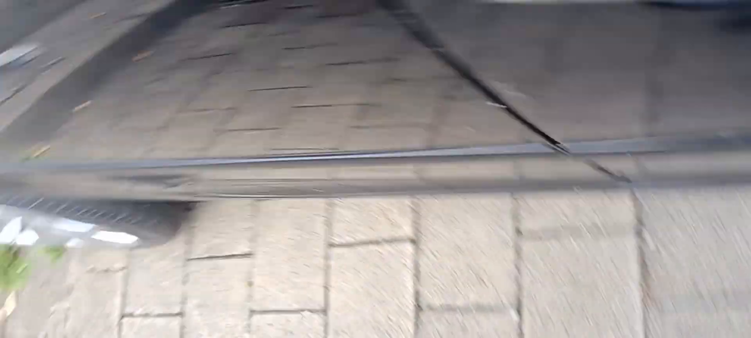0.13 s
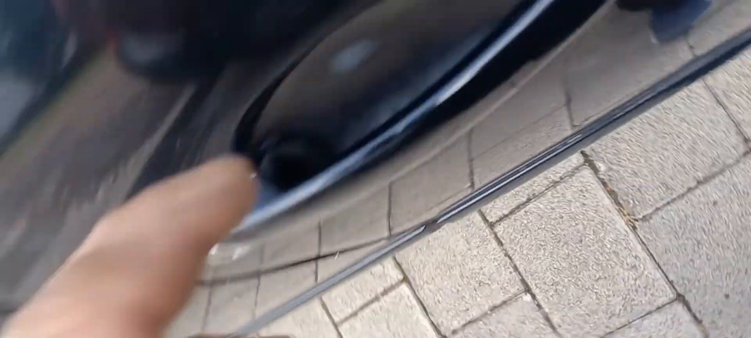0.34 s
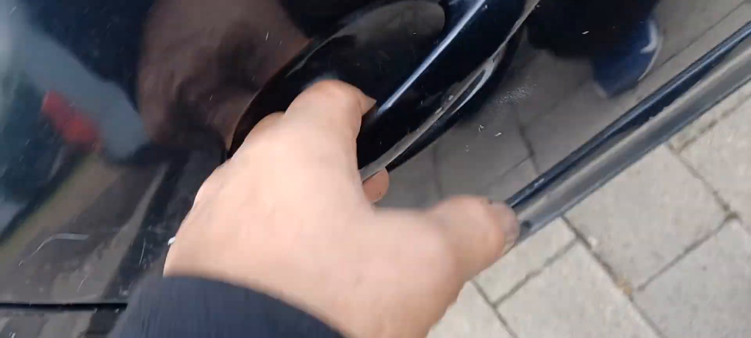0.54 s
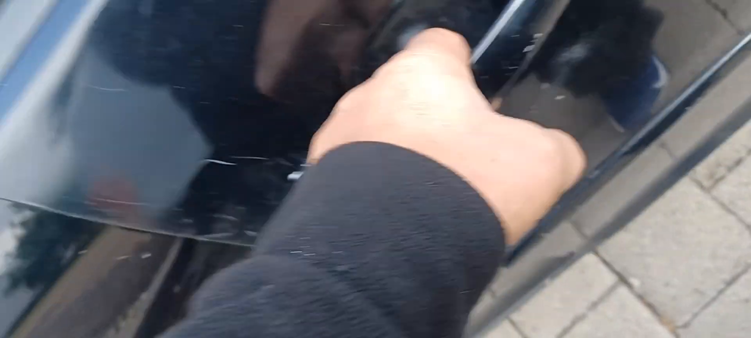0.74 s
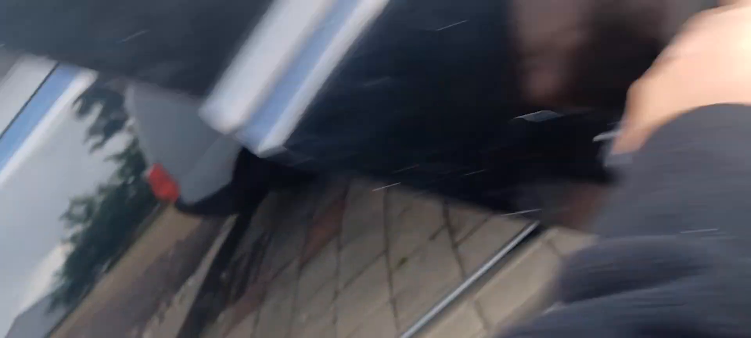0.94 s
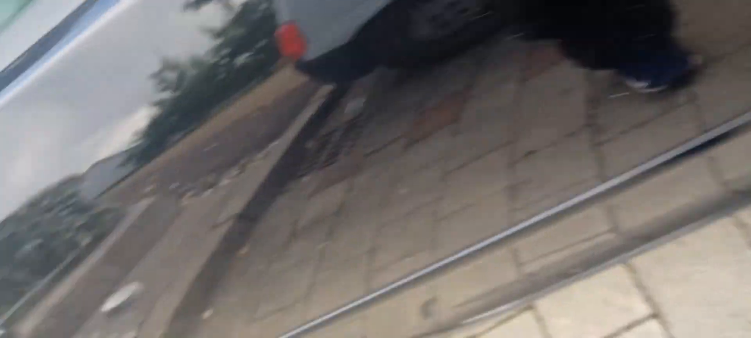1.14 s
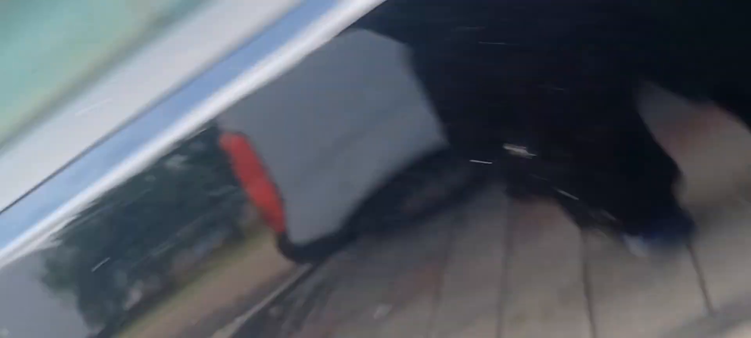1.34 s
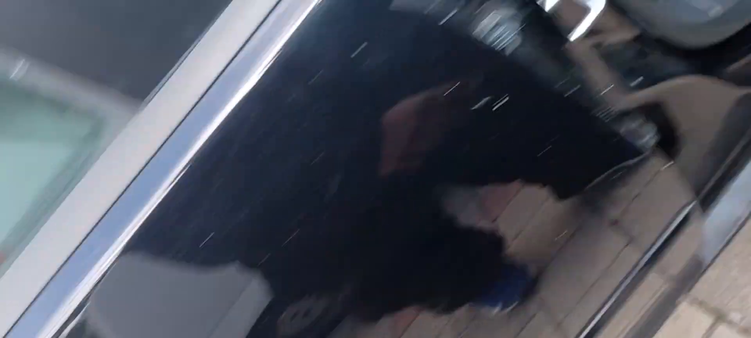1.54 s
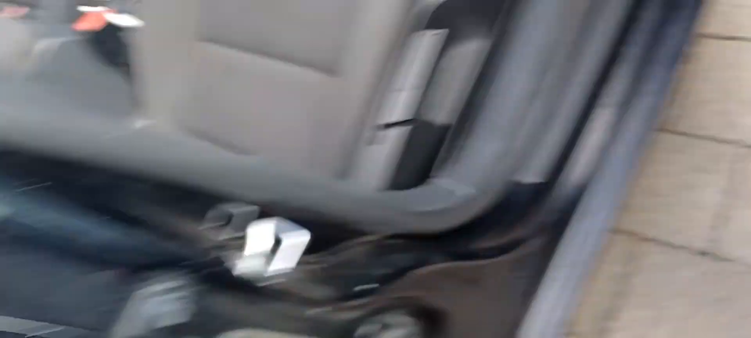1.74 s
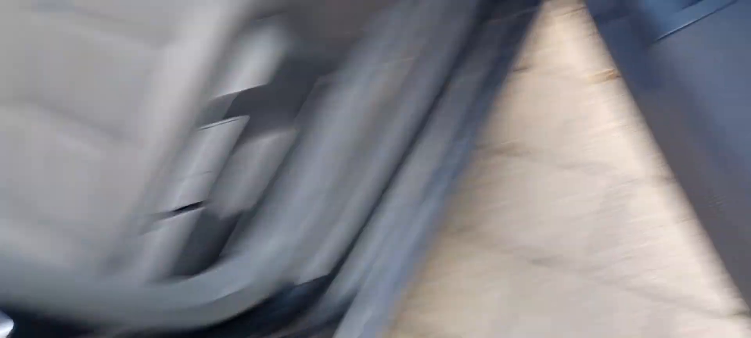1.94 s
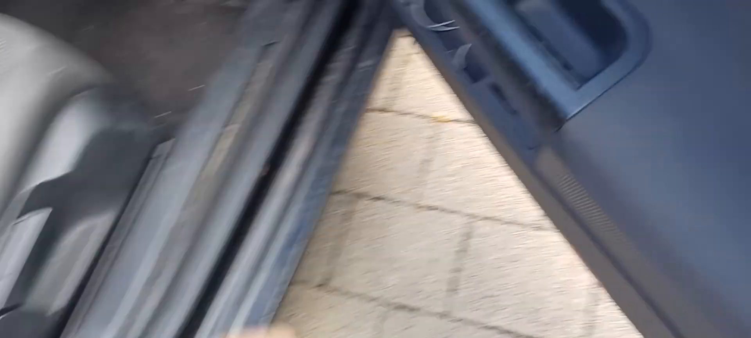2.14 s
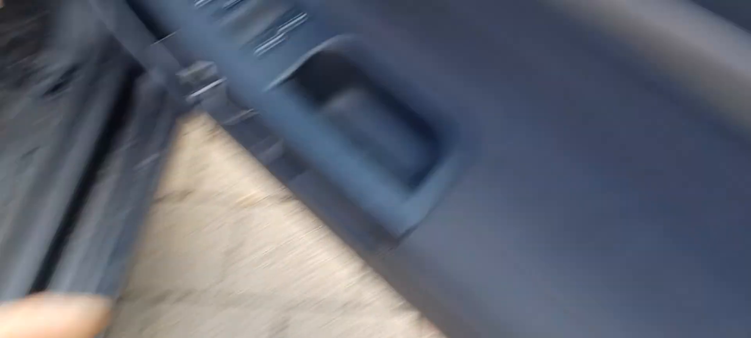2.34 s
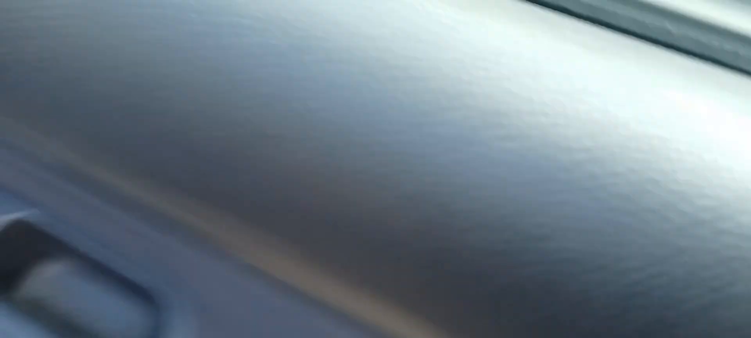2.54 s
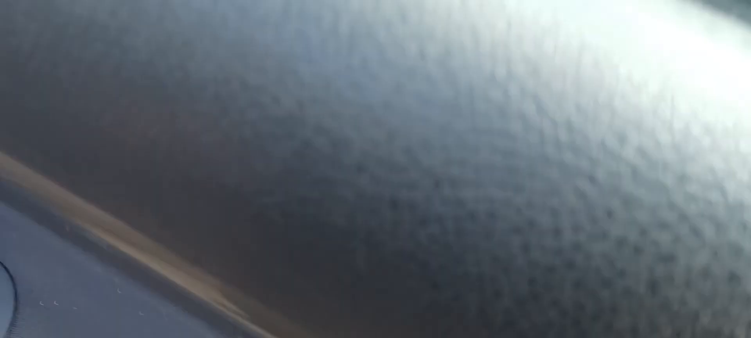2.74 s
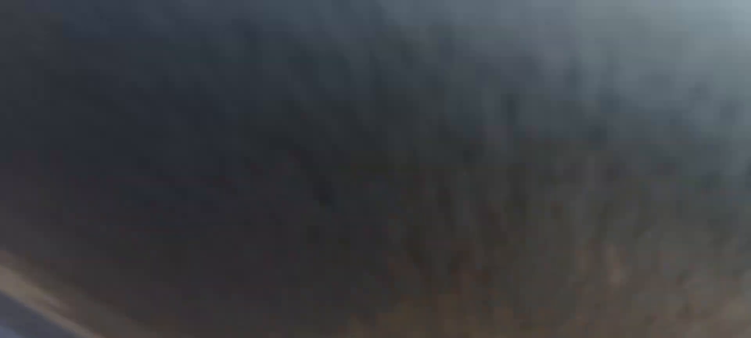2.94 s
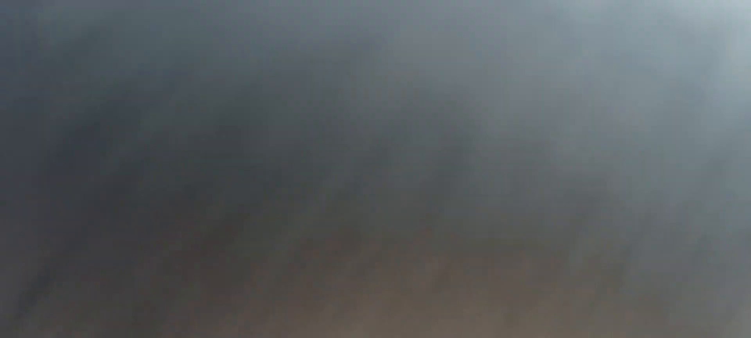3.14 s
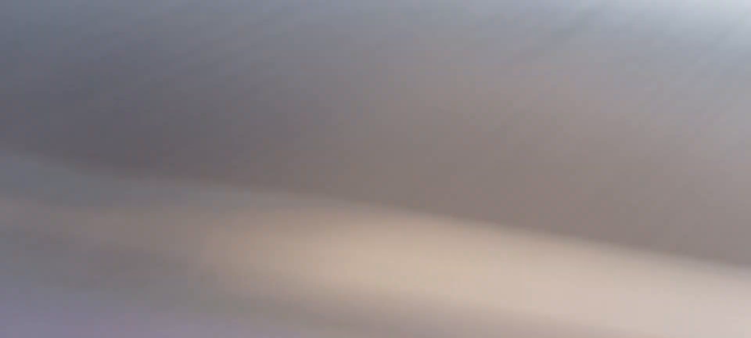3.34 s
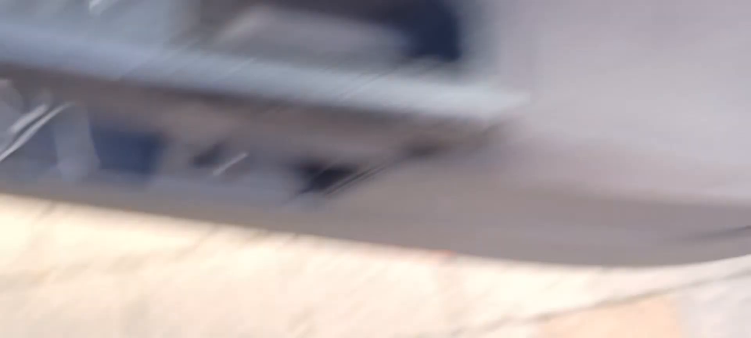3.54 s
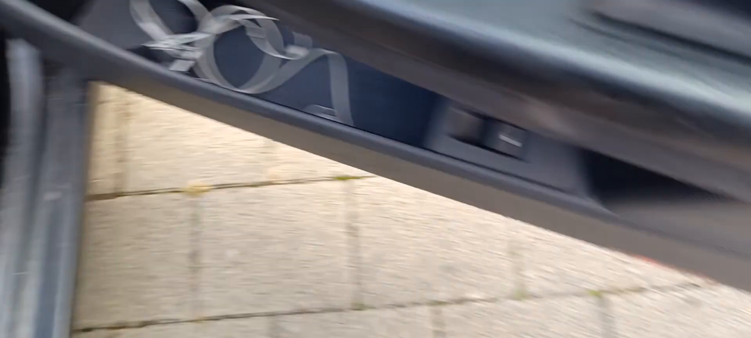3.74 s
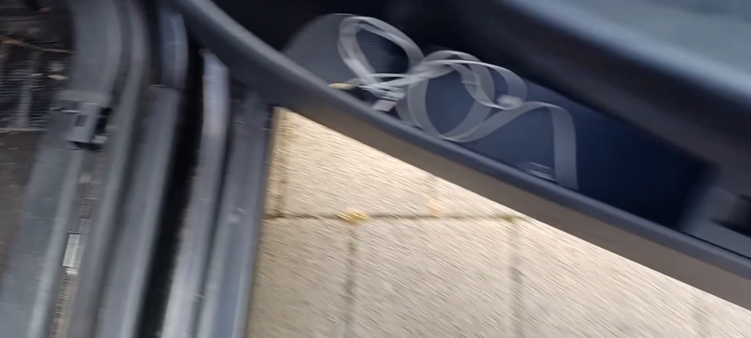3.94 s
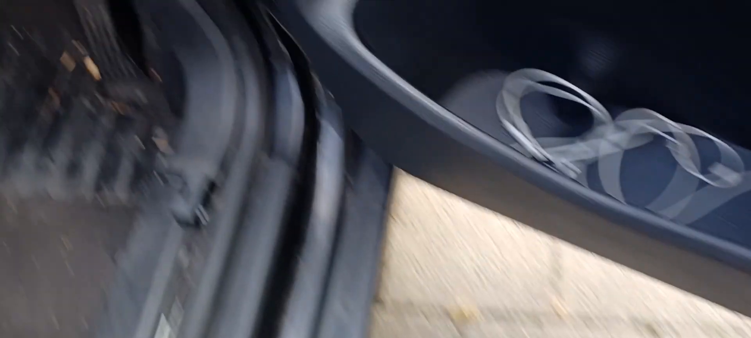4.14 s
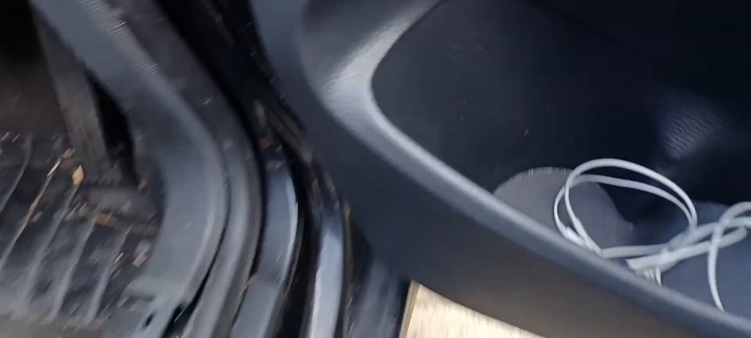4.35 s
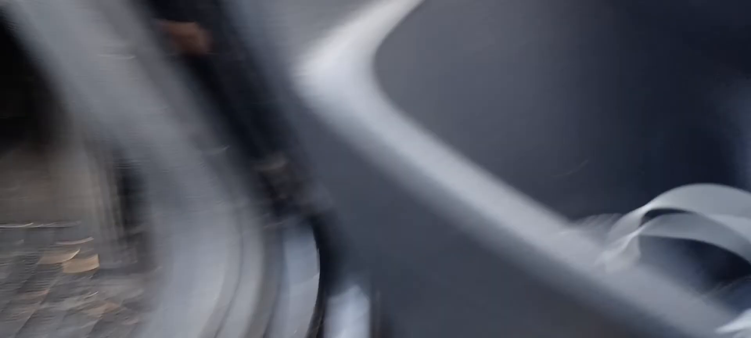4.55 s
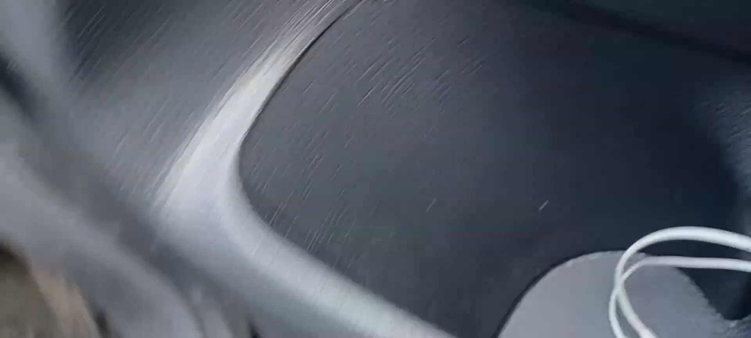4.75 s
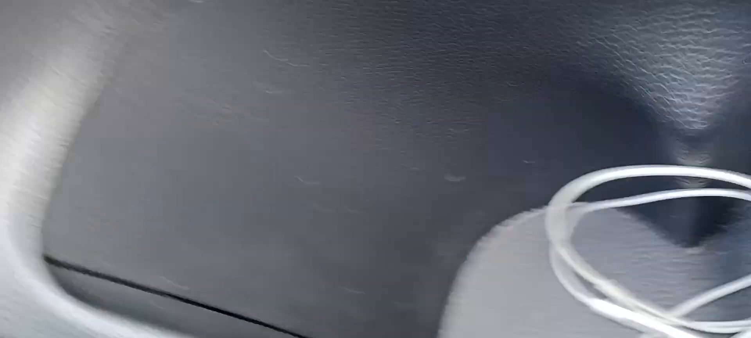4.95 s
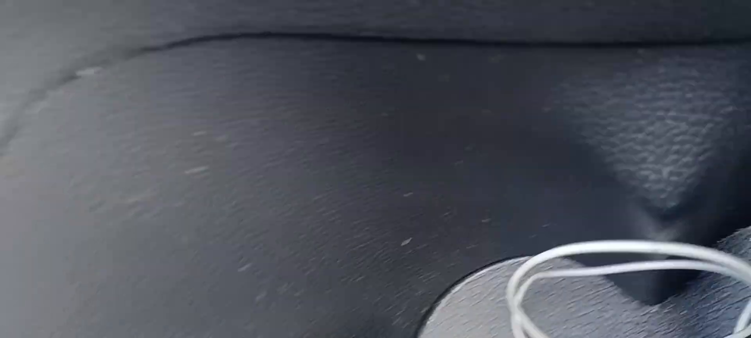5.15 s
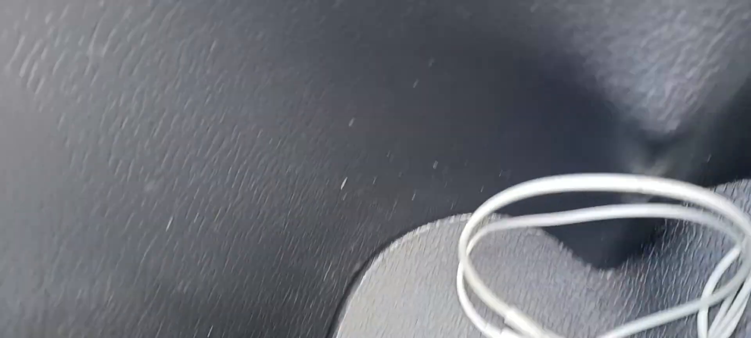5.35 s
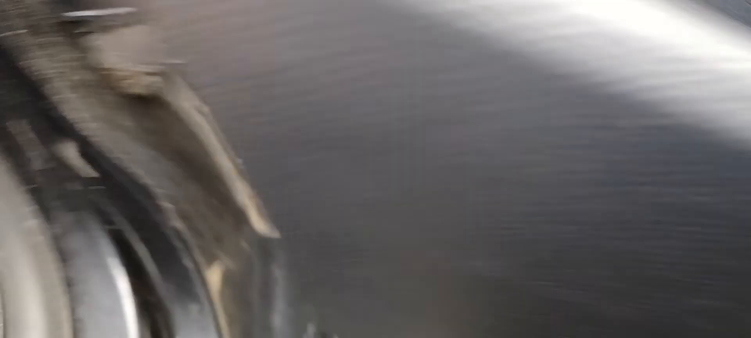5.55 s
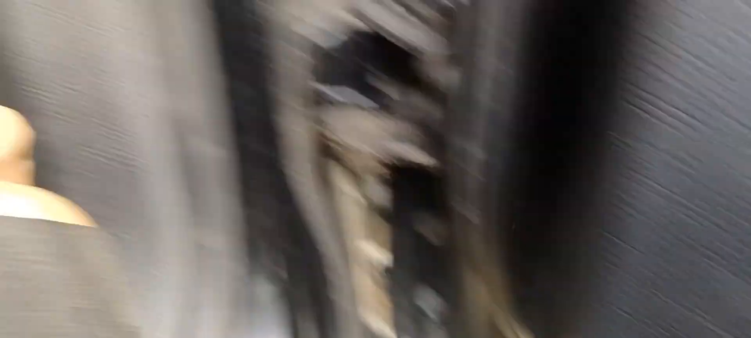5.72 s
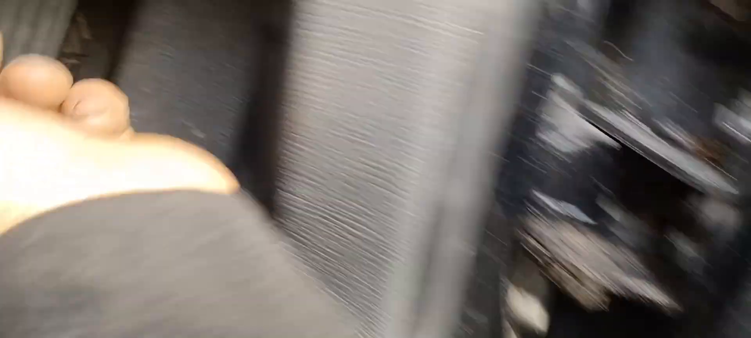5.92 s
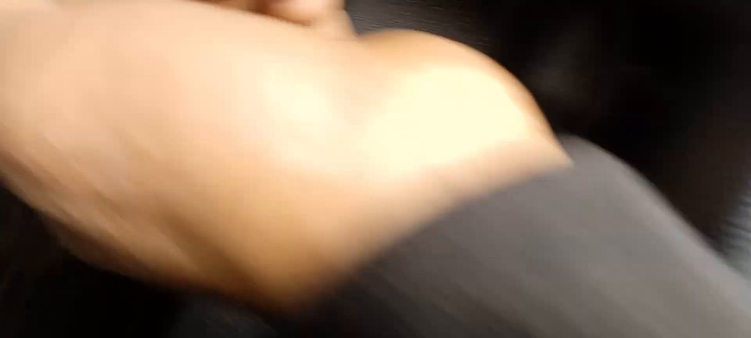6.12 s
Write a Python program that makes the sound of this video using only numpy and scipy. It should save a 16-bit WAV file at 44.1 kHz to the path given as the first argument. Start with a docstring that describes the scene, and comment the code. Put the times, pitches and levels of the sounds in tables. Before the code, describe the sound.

A dry, close stereo handheld perspective on a paved drive with very faint still air. Clothing rustles at the start and a brief stroke brushes at 0.1 s. From 0.37 s the car door handle rattles, with growing clacks and a slight springy ping around 0.53-0.6 s. At 0.69 s the latch snaps loudly, with a deep hollow sheet-metal boom; another sharp clunk comes at 1.05 s, then small ticks to 1.3 s. Soft, dull shoe thuds begin around 1.5 s and recur sparsely. At 2.5 s a hard tap on trim lands with a low handling bump, followed by lesser bumps and a sleeve brush. Quiet shuffles and faint ticks continue. Around 4.44 s comes another trim knock and thump. Cloth rustles near 4.4-5.1 s; weak hollow plastic pocket knocks occur at 5.07 and 5.36 s. From 5.7 s cloth slides, the dragged sleeve singing faintly and roughly, with a dull bump at 6.1 s.

```python
"""A car door opens on a paved drive, an arm's length from a hand-held stereo microphone.
The handle rattles, the latch snaps, the skin booms and the door knocks over its stay: struck modes and noise bursts.
Hands tick, bump the microphone's case and knock plastic trim: short bursts and modes. Shoes land as soft thuds.
Clothes and a brushing sleeve are wavering noise; the dragged sleeve sings faintly in rough partials.
Dull reflections of the blows and still air lie behind."""
import sys
import numpy as np
from scipy import signal
from scipy.fft import rfft, irfft, next_fast_len
from scipy.io import wavfile

SR = 44100
rng = np.random.default_rng(int(sys.argv[2]) if len(sys.argv) > 2 else 0)


def inscribe(sig):
    """Save sig as 16-bit PCM at rate SR to the path in sys.argv[1].

    A 1-D sig is mono; a 2-D sig holds one channel per row.
    Samples are clipped to [-1, 1] before scaling.
    """
    pcm = np.round(np.clip(np.atleast_2d(sig).T, -1, 1) * 32767)
    wavfile.write(sys.argv[1], SR, pcm.astype(np.int16))


N = 272538
TIME_S = np.arange(N) / SR
SIDES = np.array([[1], [-1]])   # left, right

# lock, handle and stay meeting their stops:
# start_s, clatter_db, boom_db, contact_ms, clatter_tilt_db_per_octave, clatter_pan_l_r_db
DOOR_CONTACTS = [(.374, -41, -30, 4, -2, -2), (.42, -56, -32, 1.93, -4.5, 4),
                 (.451, -50, -41, 0.9, 4, -0.5), (0.5334, -32.5, -22, 1.3, -.5, -1.5),
                 (.550, -25, -17.5, 4.4, -2.5, 1), (0.5923, -26.5, -13, 2.4, -3, 2),
                 (0.628, -40, -40, 3, -3.5, -0.5), (.682, -25, -6, 2, -3, -3.5),
                 (0.6924, -11, -5.5, 3.13, -.5, 7.5), (.919, -46.5, -32.5, 5.5, -5, -5.5),
                 (1.055, -17.5, -10.5, 1, 1.5, 2.5)]
# door sheet metal and cavity, clear modes: hz, level_db, t60_s
DOOR_MODES = [(78, -22, 0.24), (98.4, -19.5, 0.42), (128, -5, .15), (139.3, -1, .27), (160, -11.5, 0.082),
              (210.5, -8, 0.13), (234.4, -4, .23), (264.8, -4.5, .24), (322.6, -11, .1), (448, -13, 0.11),
              (658, -28, .3), (1096, -38, 0.77)]
# door's crowd of weaker modes: hz, level_db
DOOR_CROWD = [(60, -10.5), (110, -4), (260, -0.5), (340, -4.5), (480, -11), (800, -18), (1500, -33),
              (3000, -45)]
DOOR_CROWD_DB, DOOR_CROWD_T60_S = -14.5, 0.29
BOOM_LAG_CONTACTS, BOOM_PAN_DB = 2.0, -1.5   # lag in contact times
# clatter spectrum, also the shoes' grit: hz, level_db
CLATTER_COLOUR = [(200, -13.5), (450, 1), (800, 0), (1350, -0.5), (2200, -2.5), (3000, -15), (5800, -15.5),
                  (8500, -27), (12000, -25.5), (16000, -28.5)]
CLATTER_T60_S = 0.05
# loose parts after each contact
RATTLE_DB, RATTLE_T60_S, RATTLE_LAG_S, RATTLE_TILT_DB_PER_OCTAVE = -16.5, 0.13, 0.009, -2
# handle return spring: hz, level_db, t60_s
SPRING_MODES = [(5085, 0, 0.038), (5380, -3.5, 0.072), (5590, -10.5, .11), (5826, -9, .025)]
PULL_FROM_S, PULL_UNTIL_S = 0.44, 0.65
SPRING_DB, SPRING_DB_PER_CLATTER_DB = -36, 0.24
# latch letting go: hz, level_db, t60_s
LATCH_MODES = [(1123, -3, 0.022), (1250, -2.5, 0.039), (1930, -2.5, 0.017), (2300, -4.5, .022)]
LATCH_S, LATCH_DB, LATCH_PAN_DB = 0.6945, -4, -4.5

# hard ticks of trim and fingers: start_s, level_db, t60_s, tilt_db_per_octave, pan_l_r_db
TICKS = [(1.118, -27.5, 0.0077, -2.5, -1.5), (1.2924, -22, 0.0093, -3, 10),
         (1.307, -30.5, 0.0091, 7.5, -17.5), (1.729, -41.5, 0.073, -6, -0.5), (2.483, -39.5, 0.044, -4, -2),
         (2.5047, -9, 0.0077, -4, 2.5), (2.5758, -35, 0.0085, 2, -3), (2.8202, -46, 0.055, 2.5, -1),
         (2.8956, -38.5, 0.029, -7, -3), (3.531, -33, .06, 1, -8), (4.2817, -31, 0.036, -1.5, -1.5),
         (4.4389, -19.5, .012, 4, -11), (4.446, -21.5, 0.027, -6.5, 2), (4.4896, -29.5, .022, 5.5, -6),
         (4.5647, -36, 0.033, 6, -7), (5.0714, -37, 0.087, 2, -1), (6.1, -30.5, 0.052, -7.5, -2)]
# tick spectrum: hz, level_db
TICK_COLOUR = [(250, -5.5), (700, -5), (1400, 1), (2600, 1), (4500, -1), (6800, -4.5), (8500, -19.5),
               (12000, -11), (16000, -9.5)]
BUZZ_DB, BUZZ_T60_S = -19, 0.07   # trim after a tick
FAINT_TICKS_PER_S, FAINT_TICKS_FROM_S, FAINT_TICKS_UNTIL_S = 3, 1.7, 5.6
FAINT_TICK_DB, FAINT_TICK_SPREAD_DB, FAINT_TICK_T60_S = -61, 6, 0.028
# dull bumps through hand and microphone case: start_s, level_db, pitch_hz, pan_l_r_db
BUMPS = [(1.390, -32.5, 90.5, 10), (2.483, -14.5, 207.7, -7.5), (2.505, -13.5, 113, -2),
         (2.526, -23.5, 80, 3), (2.597, -24.5, 85, 7), (2.658, -30, 80, 12), (3.411, -25.5, 118, 6),
         (4.044, -23.5, 92.5, 34.5), (4.441, -12, 87.4, -8.5), (6.114, -26.5, 100.3, 1)]
BUMP_CYCLES = 12   # cycles per t60
SHUDDER_DB, SHUDDER_HIGHER, SHUDDER_LONGER = -15, 1.58, 1.2   # loose grip, re the bump
# knuckles on the stiff trim panel: start_s, level_db
PANEL_KNOCKS = [(2.505, -11), (2.8958, -37), (4.284, -32), (4.445, -25)]
# trim panel: hz, level_db, t60_s
PANEL_MODES = [(448, -0.5, 0.02), (690, -0.5, .013), (964, -3.5, 0.011)]
# knocks on the hollow plastic door pocket: start_s, level_db
POCKET_KNOCKS = [(5.068, -27), (5.074, -42), (5.098, -39), (5.355, -38.5), (5.367, -38), (5.381, -36.5)]
# door pocket: hz, level_db, t60_s
POCKET_MODES = [(104.5, -10, 0.093), (243.4, -2, 0.12), (374, 1.5, 0.056), (514, -4, 0.053),
                (662, -4.5, 0.057), (770, -17, 0.11)]

# shoes and shifting weight on paving: start_s, heel_to_sole_s, level_db, centre_hz, grit_db_re_thud
STEPS = [(1.536, 0.0056, -37, 212, -24.5), (1.711, 0.021, -27.5, 146.6, -20.5),
         (2.216, 0.011, -29.5, 177, -20.5), (2.655, .02, -37, 252, -12), (3.384, 0.047, -23, 194, -22),
         (3.606, 0.027, -26, 214, -19.5), (4.250, .031, -22.5, 221, -40), (4.47, 0.023, -28, 176, -14.5),
         (4.897, 0.03, -28, 240, -16.5), (5.269, .04, -41, 123, -15), (5.994, 0.019, -36, 250, -17)]
HEEL_DB, HEEL_HIGHER, SOLE_T60_S = -6, 1.11, 0.17   # heel re sole; shared t60
SETTLE_S, SETTLE_DB, SETTLE_LOWER, SETTLE_T60_S = 0.06, -11, 0.7, 0.31   # re sole
# soft thud spectrum: multiple_of_pitch, level_db
THUD_COLOUR = [(0.25, -10), (0.56, -1), (1.29, 0), (2.2, -22), (4.7, -33)]

# clothes sliding, one row a movement:
# full_speed_from_s, full_speed_until_s, swell_s, swish_db, hiss_db_re_swish, rumble_db_re_swish
SLIDES = [(0, 0.073, .1, -42.5, -4.5, -9), (4.372, 4.484, 0.49, -49.5, -8.5, 5),
          (4.732, 5.142, 0.31, -49, -3.5, 0), (5.706, 6.18, 0.4, -50, -10, -5)]
SLIDE_FADE_S = 0.22
# cloth swish spectrum: hz, level_db
SWISH = [(450, -5.5), (800, -6), (1250, -7.5), (2100, -5), (3400, -9), (6700, -10.5), (9000, -31)]
# fine cloth hiss spectrum: hz, level_db
HISS = [(7000, -12), (9000, -8.5), (12000, 1), (16000, 1.5)]
# cloth rumble spectrum: hz, level_db
RUMBLE = [(45, -9), (75, 0), (130, 0), (170, -6.5), (255, 5), (340, -4.5), (450, -10), (900, -59)]
# strokes of sleeve and fingers: start_s, length_s, level_db, tilt_db_per_octave
BRUSHES = [(0.123, 0.074, -36.5, -.5), (0.713, 0.048, -40, 2), (.996, 0.12, -45.5, -7.5),
           (1.207, 0.081, -44.5, -1.5), (1.308, 0.069, -49, -6), (1.742, .24, -56, -6),
           (1.835, 0.058, -55, -3.5), (2.641, 0.074, -35, -1), (2.998, 0.074, -43.5, -1),
           (3.074, .18, -57.5, -3.5), (3.312, 0.07, -50, -4), (3.436, 0.095, -52, -2.5),
           (5.348, 0.065, -49, -3.5), (5.391, .13, -56, -5.5), (5.957, 0.15, -39.5, -3.5)]
# stroke spectrum: hz, level_db
BRUSH_COLOUR = [(150, -9), (500, -6.5), (1500, -3.5), (3500, -1.5), (6500, -2.5), (8500, -14), (12000, -4),
                (16000, -7.5)]
# stroke speed: fraction_of_length, gain
STROKE_SPEED = [(0, 0.099), (0.09, 0.81), (0.55, 1.38), (0.8, 0.36), (1, 0.13)]
# resonance of the rubbed spot; a brighter stroke has a higher one
BRUSH_PEAK_DB, BRUSH_PEAK_OCTAVES = 3.5, 0.36
BRUSH_HZ, BRUSH_OCTAVES_PER_TILT, BRUSH_PAN_DB = 3600, 0.19, -0.4
# sleeve dragged over grained trim: time_s, level_db, pitch_hz
DRAG = [(5.83, -74, 1348), (5.87, -51.5, 1196), (5.92, -49.5, 1255), (6.0, -52, 1217), (6.08, -51.5, 1098),
        (6.18, -59, 1210)]
# sleeve partials: multiple_of_pitch, level_db
DRAG_PARTIALS = [(.8, 4), (1, 1.5), (1.7, -1.5), (3.8, -16), (8.4, -8)]

# reflections off paving, car side and walls: hz, level_db
ECHO_COLOUR = [(150, 6), (600, -3), (2000, -11), (6000, -5), (16000, -29)]
ECHO_DB = -26.5
# still outdoor air: hz, level_db
AIR = [(35, -16), (75, -1), (250, -2), (500, -17.5), (2200, -19.5), (6500, -28.5), (9000, -36),
       (16000, -29.5)]
AIR_DB = -66
# likeness of the two microphone ports: hz, correlation
LIKENESS = [(60, 0.76), (140, 0.94), (260, 0.92), (550, 0.5), (1200, 0), (2500, 0), (6000, 0.02),
            (14000, 0)]
# balance of the two ports: hz, l_r_db
BALANCE = [(60, -6), (200, -1), (600, 0), (1900, -9.5), (4000, -8), (8000, -0.5), (14000, -2)]
BASS_CUT_HZ, TOP_CUT_HZ, PEAK_LIMIT = 52, 16200, 0.9


def from_db(db):
    """Decibels to gain."""
    return 10 ** (np.asarray(db) / 20)


def rms_one(x):
    """Scale to rms 1."""
    return x / np.sqrt(np.mean(x ** 2) + 1e-20)


def in_time(rows):
    """Each column of a curve at every sample."""
    s, *columns = np.transpose(rows)
    return [np.interp(TIME_S, s, c) for c in columns]


def at_hz(points, hz):
    """Read a table on a log-frequency axis."""
    known_hz, values = np.transpose(points)
    return np.interp(np.log(hz), np.log(known_hz), values)


def panned(pan_db):
    """Left and right gains of unchanged total power."""
    return rms_one(from_db(SIDES * pan_db / 2))


def add(out, start_s, sound):
    """Mix a sound in at start_s."""
    start = max(round(start_s * SR), 0)
    out[:, start:start + sound.shape[-1]] += sound[..., :N - start]


def noise(colour, count, tilt_db=0, ripple_db=0):
    """Coloured stereo noise of rms 1, port likeness set per frequency; ripple adds chance resonances."""
    size = next_fast_len(count + 2048)
    hz = np.maximum(np.fft.rfftfreq(size, 1 / SR), 1)
    mid, side = rfft(rng.standard_normal((2, size)))
    alike = np.clip(at_hz(LIKENESS, hz), -1, 1)
    octaves_outside = np.abs(np.log2(hz / np.clip(hz, colour[0][0], colour[-1][0])))
    level_db = at_hz(colour, hz) + tilt_db * np.log2(hz / 2000) - 30 * octaves_outside
    level_db = level_db + SIDES * at_hz(BALANCE, hz) / 2
    ripple_hz = np.geomspace(400, 16000, 90)
    level_db += ripple_db * np.interp(hz, ripple_hz, rng.standard_normal(90), left=0)
    ports = np.sqrt(1 + alike) * mid + SIDES * np.sqrt(1 - alike) * side
    return rms_one(irfft(ports * from_db(level_db), size)[:, :count])


def flutter(rate_hz, depth_db, count):
    """A gain that wavers at random, as fibres catch and slip; rms 1."""
    knots = rng.standard_normal(int(count / SR * rate_hz) + 2)
    position = np.arange(count) / SR * rate_hz
    return rms_one(from_db(depth_db * np.interp(position, np.arange(len(knots)), knots)))


def burst(colour, t60_s, rise_s, tilt_db=0):
    """Many close modes struck at once: noise that swells quickly and dies away."""
    t = np.arange(int((1.3 * t60_s + rise_s) * SR)) / SR
    shape = (1 - np.exp(-t / rise_s)) * from_db(-60 * t / t60_s)
    ringing = noise(colour, len(t), tilt_db, ripple_db=2)
    return rms_one(ringing * shape) * np.sqrt(np.mean(shape ** 2))


def struck(modes, contact_ms=0):
    """One blow on a set of modes; long contact spares high ones, short waves reach the ports out of step."""
    t, out = np.arange(int(0.7 * SR)) / SR, 0
    for k, (hz, level_db, t60_s) in enumerate(modes):
        port_phase = np.arccos(np.clip(at_hz(LIKENESS, hz), -1, 1)) * SIDES / 2
        chance_db = rng.standard_normal()
        gain = from_db(level_db + chance_db) / np.hypot(1, hz * contact_ms / 1000)
        swell = 1 - np.exp(-(4 * hz * t) ** 2)
        tone = np.sin(2 * np.pi * hz * t + port_phase) * from_db(-60 * t / t60_s)
        out = out + (-1) ** k * gain * swell * tone   # alternate polarity
    return out


def thud(hz, t60_s, rise_s):
    """A soft, damped impact about one pitch."""
    return burst([(hz * multiple, db) for multiple, db in THUD_COLOUR], t60_s, rise_s)


def door_contacts():
    """At each contact parts clatter and rattle on, the skin gives way late and booms, a pulled spring pings."""
    out = np.zeros((2, N))
    for start_s, clatter_db, boom_db, contact_ms, tilt_db, pan_db in DOOR_CONTACTS:
        crowd = from_db(DOOR_CROWD_DB) * burst(DOOR_CROWD, DOOR_CROWD_T60_S, rise_s=0.002)
        boom_s = start_s + BOOM_LAG_CONTACTS * contact_ms / 1000
        for part in struck(DOOR_MODES, contact_ms), crowd:
            add(out, boom_s, from_db(boom_db) * panned(BOOM_PAN_DB) * part)
        gain = from_db(clatter_db) * panned(pan_db)
        clatter = burst(CLATTER_COLOUR, CLATTER_T60_S, rise_s=0.00032, tilt_db=tilt_db)
        rattle = burst(CLATTER_COLOUR, RATTLE_T60_S, rise_s=0.0013, tilt_db=RATTLE_TILT_DB_PER_OCTAVE)
        add(out, start_s, gain * clatter)
        add(out, start_s + RATTLE_LAG_S, gain * from_db(RATTLE_DB) * rattle)
        if PULL_FROM_S < start_s < PULL_UNTIL_S:
            spring_db = SPRING_DB + SPRING_DB_PER_CLATTER_DB * clatter_db
            add(out, start_s, from_db(spring_db) * struck(SPRING_MODES))
    return out


def latch():
    """The latch lets go: one blow on its short, high modes."""
    out = np.zeros((2, N))
    add(out, LATCH_S, from_db(LATCH_DB) * panned(LATCH_PAN_DB) * struck(LATCH_MODES))
    return out


def ticks():
    """Hard contacts of trim and fingers: a sharp crack, then a brief buzz of the trim."""
    out = np.zeros((2, N))
    for start_s, level_db, t60_s, tilt_db, pan_db in TICKS:
        crack = burst(TICK_COLOUR, t60_s, rise_s=0.000177, tilt_db=tilt_db)
        buzz = from_db(BUZZ_DB) * burst(TICK_COLOUR, BUZZ_T60_S, rise_s=0.001, tilt_db=tilt_db)
        for part in crack, buzz:
            add(out, start_s, from_db(level_db) * panned(pan_db) * part)
    return out


def bumps():
    """Bumps on the microphone's case: one low damped mode and a shudder of the loose grip."""
    out = np.zeros((2, N))
    for start_s, level_db, hz, pan_db in BUMPS:
        t60_s = BUMP_CYCLES / hz
        shudder = thud(hz * SHUDDER_HIGHER, t60_s * SHUDDER_LONGER, rise_s=0.0031)
        for part in struck([(hz, level_db, t60_s)]), from_db(level_db + SHUDDER_DB) * shudder:
            add(out, start_s, panned(pan_db) * part)
    return out


def trim_knocks():
    """Blows on the stiff panel and the hollow pocket, each ringing its own modes."""
    out = np.zeros((2, N))
    for knocks, modes in (PANEL_KNOCKS, PANEL_MODES), (POCKET_KNOCKS, POCKET_MODES):
        for start_s, level_db in knocks:
            add(out, start_s, from_db(level_db) * struck(modes))
    return out


def shoes():
    """Each footfall is heel, sole and settling weight: three soft thuds, each with a little grit."""
    out = np.zeros((2, N))
    for start_s, roll_s, level_db, hz, grit_db in STEPS:
        heel = (0, HEEL_DB, HEEL_HIGHER, SOLE_T60_S)
        sole = (roll_s, 0, 1, SOLE_T60_S)
        settling = (roll_s + SETTLE_S, SETTLE_DB, SETTLE_LOWER, SETTLE_T60_S)
        for lag_s, part_db, pitch, t60_s in heel, sole, settling:
            gain = from_db(level_db + part_db)
            add(out, start_s + lag_s, gain * thud(hz * pitch, t60_s, rise_s=0.007))
            grit = burst(CLATTER_COLOUR, t60_s, rise_s=0.0056)
            grit = grit * flutter(rate_hz=195, depth_db=3, count=grit.shape[1])
            add(out, start_s + lag_s, gain * from_db(grit_db) * grit)
    return out


def brushes():
    """Each stroke swells and eases off; fibres catch and slip, the rubbed spot has one broad resonance."""
    out, hz = np.zeros((2, N)), np.geomspace(150, 16000, 60)
    for start_s, length_s, level_db, tilt_db in BRUSHES:
        count = int(length_s * SR)
        speed = np.interp(np.linspace(0, 1, count), *np.transpose(STROKE_SPEED))
        peak_hz = BRUSH_HZ * 2 ** (BRUSH_OCTAVES_PER_TILT * tilt_db)
        peak_db = BRUSH_PEAK_DB * np.exp(-(np.log2(hz / peak_hz) / BRUSH_PEAK_OCTAVES) ** 2)
        colour = np.column_stack([hz, at_hz(BRUSH_COLOUR, hz) + peak_db])
        rub = noise(colour, count, tilt_db, ripple_db=2.5)
        grain = flutter(rate_hz=600, depth_db=3, count=count)
        add(out, start_s, from_db(level_db) * panned(BRUSH_PAN_DB) * speed * grain * rub)
    return out


def clothes():
    """Cloth slides while the body moves: each movement swells, holds and fades as folds snag and let go."""
    swish = noise(SWISH, N, ripple_db=1.5) * flutter(rate_hz=560, depth_db=1.5, count=N)
    hiss = noise(HISS, N, ripple_db=2) * flutter(rate_hz=250, depth_db=1, count=N)
    rumble = noise(RUMBLE, N) * flutter(rate_hz=7.3, depth_db=1, count=N)
    out = np.zeros((2, N))
    for from_s, until_s, swell_s, level_db, hiss_db, rumble_db in SLIDES:
        corners_s = [from_s - swell_s, from_s, until_s, until_s + SLIDE_FADE_S]
        speed = np.interp(TIME_S, corners_s, [0, 1, 1, 0])
        cloth = swish + from_db(hiss_db) * hiss + from_db(rumble_db) * rumble
        out += from_db(level_db) * speed ** 2 * cloth
    return out * flutter(rate_hz=25, depth_db=2.77, count=N)


def sleeve_drag():
    """Ribs of cloth crossing the grain give rough tones whose pitch follows the speed."""
    level_db, hz = in_time(DRAG)
    on, out = TIME_S > DRAG[0][0], np.zeros((2, N))
    phase = 2 * np.pi * np.cumsum(hz[on]) / SR
    for multiple, partial_db in DRAG_PARTIALS:
        # higher partials are broader
        blur = signal.butter(2, 15 + 25 * multiple, fs=SR, output="sos")
        a, b = rms_one(signal.sosfilt(blur, rng.standard_normal((2, 2, on.sum()))))
        tone = (a * np.cos(multiple * phase) + b * np.sin(multiple * phase)) / np.sqrt(2)
        out[:, on] += from_db(level_db[on] + partial_db) * tone
    return out * panned(pan_db=0.5)


def faint_ticks():
    """Fingers and trim tick faintly at random times and levels."""
    out = np.zeros((2, N))
    count = int(FAINT_TICKS_PER_S * (FAINT_TICKS_UNTIL_S - FAINT_TICKS_FROM_S))
    draws = rng.uniform([FAINT_TICKS_FROM_S, -1], [FAINT_TICKS_UNTIL_S, 1], (count, 2))
    for start_s, size in draws:
        gain = from_db(FAINT_TICK_DB + FAINT_TICK_SPREAD_DB * size)
        add(out, start_s, gain * burst(TICK_COLOUR, FAINT_TICK_T60_S, rise_s=0.0004))
    return out


def driveway(x):
    """Dull reflections from paving, car side and walls: convolution with a decaying noise burst."""
    echo = burst(ECHO_COLOUR, t60_s=0.28, rise_s=0.016)
    unit_echo = echo / np.sqrt(np.sum(echo ** 2) / 2)
    return from_db(ECHO_DB) * signal.fftconvolve(x, unit_echo, axes=1)[:, :N]


def still_air():
    """Outdoor air: steady, faint coloured noise."""
    return from_db(AIR_DB) * noise(AIR, N)


def scene():
    """All sources; only door, ticks, bumps and knocks are answered by the surroundings."""
    blows = door_contacts() + latch() + ticks() + bumps() + trim_knocks()
    cloth = brushes() + clothes() + sleeve_drag()
    return blows + shoes() + cloth + faint_ticks() + driveway(blows) + still_air()


def record(dry):
    """The microphone loses the deep bass, peaks are clipped, then the top is cut."""
    bass_cut = signal.butter(3, BASS_CUT_HZ, "high", fs=SR, output="sos")
    top_cut = signal.ellip(10, 0.1, 80, TOP_CUT_HZ, fs=SR, output="sos")
    clipped = np.clip(signal.sosfilt(bass_cut, dry), -PEAK_LIMIT, PEAK_LIMIT)
    return signal.sosfilt(top_cut, clipped)


dry = scene()
out = record(dry)
inscribe(out)
```